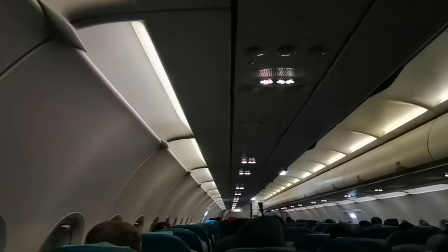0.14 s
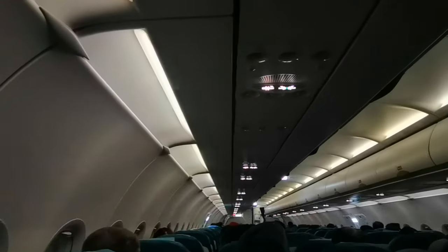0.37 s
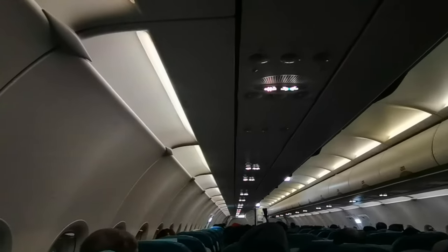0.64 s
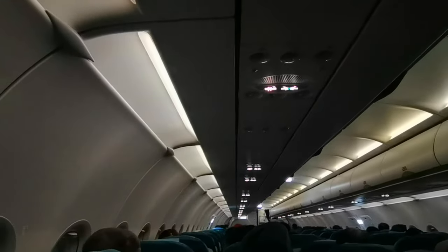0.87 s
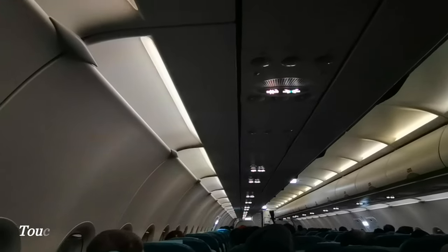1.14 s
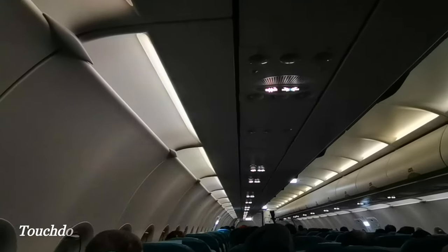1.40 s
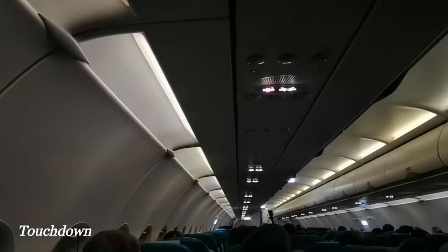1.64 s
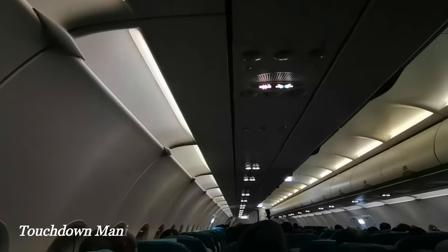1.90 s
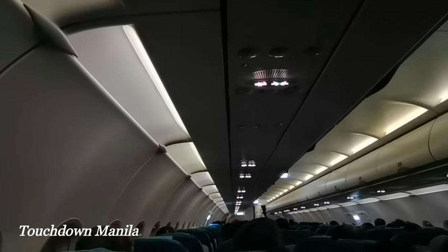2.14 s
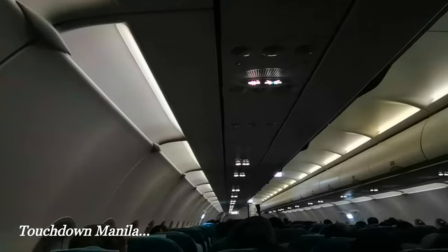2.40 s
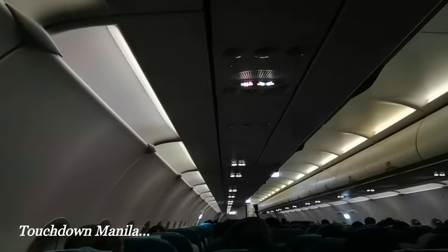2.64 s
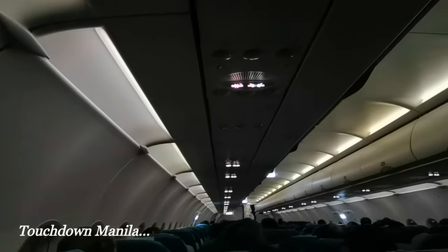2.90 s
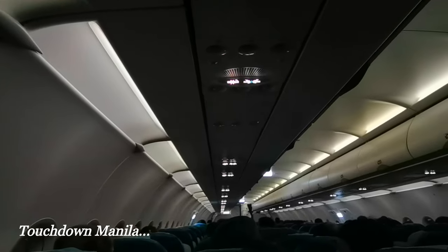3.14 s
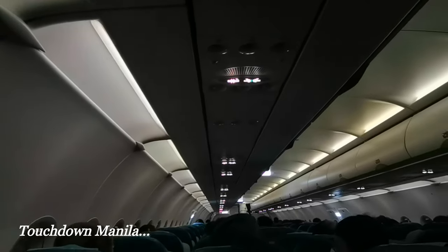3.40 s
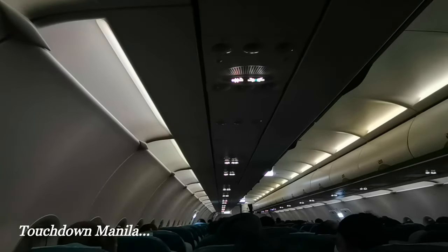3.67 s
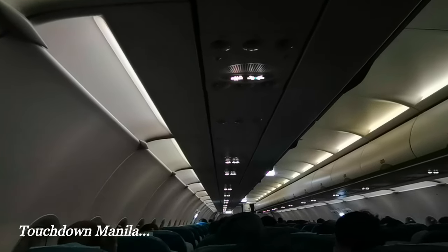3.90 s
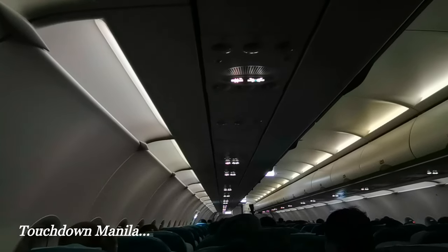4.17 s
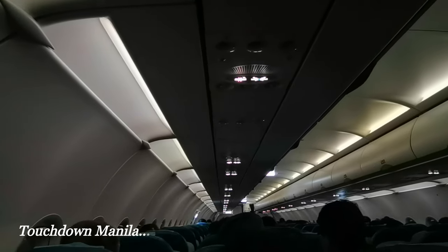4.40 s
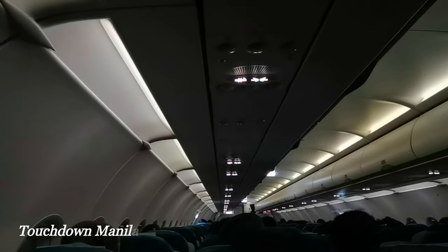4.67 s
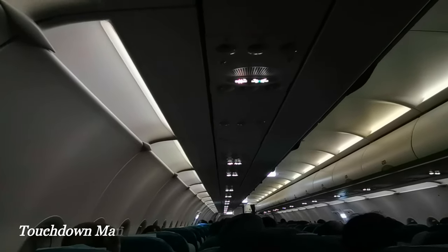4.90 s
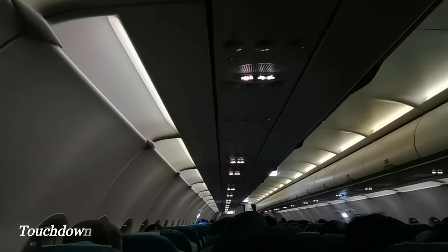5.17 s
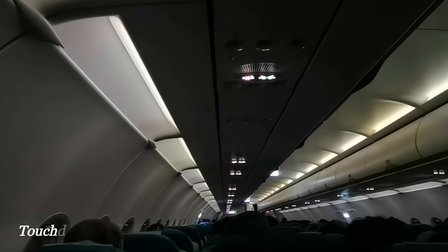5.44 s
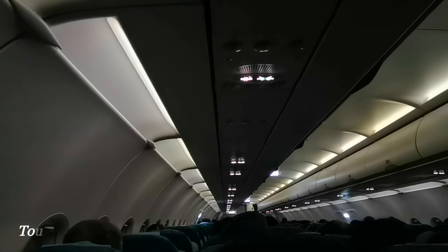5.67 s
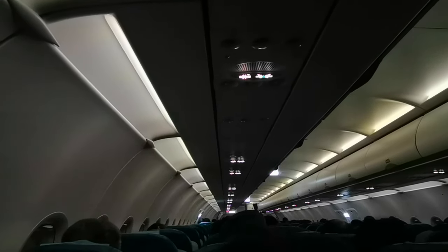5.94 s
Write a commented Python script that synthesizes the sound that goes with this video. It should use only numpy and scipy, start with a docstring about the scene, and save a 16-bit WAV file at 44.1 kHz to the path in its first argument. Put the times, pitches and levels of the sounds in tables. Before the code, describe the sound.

A close snap and hull boom open a loud, bass-heavy cabin rumble with jet roar, which falls off after four seconds into quieter rolling.

```python
"""Hull boom and a close snap open the scene: an airliner cabin rolling out after touchdown.
Swelling low noise booms in the hull; wavering noise carries wheel rumble through the floor.
Engine growl, roar and hiss are shaped noise under reverse thrust that eases, then is cut.
Filtered puffs make trim ticks and rustles; resonated noise makes a thin whine and a late drone.
Two microphone ports with different treble pick it up, over a faint treble noise floor."""
import sys
import numpy as np
from scipy import signal
from scipy.fft import rfft, irfft, next_fast_len
from scipy.io import wavfile
from scipy.ndimage import uniform_filter1d, minimum_filter1d

SR = 44100
rng = np.random.default_rng(int(sys.argv[2]) if len(sys.argv) > 2 else 0)


def gain_from_db(level_db):
    """Convert decibel levels to linear amplitude factors (20 dB per decade)."""
    decades = np.asarray(level_db, float) / 20
    return 10 ** decades


def wrap_up_sound(samples):
    """Save the sound to the file named by the first command line argument, as 16-bit audio."""
    columns = np.atleast_2d(samples).T
    # keep every value between -1 and 1, then stretch to whole-number steps
    tamed = np.clip(columns, -1, 1)
    steps = np.round(tamed * 32767).astype(np.int16)
    wavfile.write(sys.argv[1], SR, steps)


N = 266883

# Left-right likeness of the noise layers [freq_hz, coherence_0_to_1]
COHERENCE = [(30, .999), (58, .997), (80, .972), (200, .93), (290, .91), (390, .8), (520, .48), (700, .6),
             (900, .24), (1100, .05), (1500, .25), (2300, .03), (15000, .03)]
# Phase by which the right port lags [freq_hz, lag_rad]
PORT_LAG = [(35, .11), (110, .23), (155, .3), (290, .28), (520, .58), (900, 1.), (1500, 3.4), (2000, 4.1)]
# Difference of the ports' colour [freq_hz, left_minus_right_db]
PORT_COLOUR = [(40, 1.6), (200, 1.75), (700, .5), (1300, -1.5), (3200, 1), (4200, -4), (5200, -4.5),
               (6200, 2), (7200, 17.5), (8200, 4.5), (9700, 3.5), (11700, 10), (12700, 4), (13700, 2.5),
               (15500, 3.5)]
# Reverse thrust held, eased, then cut [time_s, level_re_full_db]
THRUST = [(0, 0), (2.8, 0), (3.5, -1), (4.23, -4.5), (4.41, -4), (4.5, -12), (4.75, -15), (5.2, -19),
          (6.05, -20.5)]
# Shaking from the wheels as the roll slows [time_s, level_re_full_speed_db]
ROLL = [(0, 0.5), (2.8, 0), (3.6, -1), (4.3, -4.5), (4.75, -4.5), (5.1, -8.5), (5.4, -11), (5.7, -12),
        (6.05, -14.5)]
# Strength of the thin whine before flicker and panning [time_s, relative_level_db]
WHINE_LEVEL = [(0, -88.5), (3, -86), (3.6, -76), (4.3, -69), (4.6, -72.5), (5.05, -77), (5.3, -90),
               (5.6, -79), (6.05, -81)]
# Strength of the breathy drone as the roar dies, before panning [time_s, relative_level_db]
DRONE_LEVEL = [(5.3, -99), (5.5, -78.5), (5.7, -64), (5.85, -65.5), (6.05, -70)]
# Resonances of the drone [freq_hz, width_hz, level_db]
DRONE_PEAKS = [(1490, 95, -5.5), (1700, 150, -1), (2950, 220, -12)]
# Ticks of trim and latches [start_s, level_db, low_hz, high_hz, left_minus_right_db]
TICKS = [(0.0488, -37, 3500, 5600, 8), (2.57, -49, 2400, 5000, 2), (3.0, -52.5, 2200, 6100, -1),
         (3.838, -64, 12000, 15260, 4.5), (4.136, -61.5, 7000, 7560, -5), (4.611, -48, 2200, 15550, 3),
         (4.934, -51.5, 1290, 5700, -5), (5.482, -60.5, 1290, 5500, -5), (5.647, -55, 1800, 5900, -2)]
# Soft rustles of the same trim [start_s, level_db, low_hz, high_hz, t60_s]
RUSTLES = [(.222, -59.5, 6500, 15500, .15), (0.969, -67, 8500, 15400, 0.23), (1.815, -63, 6500, 15480, .12),
           (1.95, -65, 11000, 15200, .1), (2.34, -55.5, 4930, 15750, 0.12), (2.655, -61, 6360, 15300, .12),
           (2.859, -67.5, 9000, 15700, .2), (3.93, -62.5, 6360, 15200, .1), (4.27, -56.5, 3650, 4460, 0.58),
           (4.54, -68.5, 7050, 7400, 0.46), (5.36, -69, 5000, 15100, .14)]
# Resonances of the trim [freq_hz, width_hz, relative_level_db]
TRIM_PEAKS = [(1550, 230, 5.5), (2320, 600, -3), (4200, 740, -0.5), (7000, 1100, 5.5), (14500, 2500, -1.5)]
# Close snap [start_s, ring_peak_db, left_minus_right_db]
SNAPS = [(.06035, -4, 12)]
# Modes of the snap [freq_hz, relative_level_db, t60_s]
SNAP_MODES = [(696, -4, 0.0061), (1590, 11, 0.0013), (3730, 9.5, 0.0019), (5200, -7, 0.0016),
              (6840, -10.5, 0.0056), (13300, -11.5, .004)]
# Wheel rumble spectrum [freq_hz, relative_level_db_per_hz]
RUMBLE_SHAPE = [(41, -26.5), (70, -10.5), (81, -1.5), (118, 1), (172, -3), (240, -13.5), (310, -40),
                (530, -120)]
# Brief surges and dips of the rumble [time_s, change_db]
WAVERS = [(.285, -8), (.57, -6.5), (1.261, 6.5), (1.3, -12), (1.335, 6.5), (1.38, -10.5), (1.48, -5),
          (2.16, -11.5), (2.33, -7.5), (2.42, 3), (2.74, 5), (2.786, -5), (3.549, -9), (3.691, 0.5),
          (3.79, -4), (3.84, 3), (3.89, -4.5), (4.38, -3), (4.57, -3), (5.208, -8), (5.43, -8), (5.56, 4),
          (5.63, 5), (5.711, -7.5), (5.8, 3.5), (5.85, -5.5), (5.91, 7)]
# Rumble balance and dulling as the roll slows [time_s, left_minus_right_db, upper_part_loss_db]
LEAN = [(4.6, -1.5, -0.5), (4.9, 3, 0.5), (5.25, 6, 3.5), (5.5, 6, -3.5), (5.65, 4, 5.5), (5.9, 4, 7.5)]
# Jet growl spectrum [freq_hz, relative_level_db_per_hz]
GROWL_SHAPE = [(120, -34), (210, -1), (232, -8.5), (279, 0.5), (430, -17), (560, -51), (950, -120)]
# Jet roar spectrum [freq_hz, relative_level_db_per_hz]
ROAR_SHAPE = [(240, -22), (410, -6), (461, -3), (638, -4), (1190, -21), (1400, -23.5), (1820, -36.5),
              (3080, -120)]
# Hiss spectrum [freq_hz, relative_level_db_per_hz]
HISS_SHAPE = [(650, -26), (1100, -6.5), (1190, -6), (1890, -6), (3250, -15.5), (4170, -13.5), (4790, -18.5),
              (5990, -21), (7370, -24.5), (7960, -24), (8600, -35.5), (11200, -59), (18900, -120)]
# Spectrum of the faint top-band noise floor [freq_hz, relative_level_db_per_hz]
TREBLE_FLOOR_SHAPE = [(7500, -36), (8600, -4.5), (9500, -7), (11500, -6), (14500, -0.5), (15600, -7.5)]
# Growl, roar, hiss, treble floor, one row each [level_at_full_db, thrust_fall_share, roll_fall_share]
NOISE_LAYERS = [(-24, .2, 1.22), (-33.5, 0.94, .01), (-50, 0.74, .01), (-70.5, 0.39, .2)]
# Hull boom spectrum [freq_hz, relative_level_db_per_hz]
BOOM_SHAPE = [(15, -40), (27, -21), (40, -8), (46, -3), (51, 0), (58, -3), (68, -8), (78, -10), (95, -30),
              (190, -120)]
# Loudest boom swells, where the runway shakes the hull [centre_s, level_db, half_width_s]
BOOM_SWELLS = [(.09, -8.5, .05), (.24, -19.5, 0.13), (.55, -11.5, 0.11), (.74, -18.5, 0.1),
               (.85, -9.5, 0.064), (1.031, -15.5, 0.089), (1.171, -12.5, 0.025), (1.28, -16, 0.037),
               (1.4, -9.5, 0.04), (1.51, -9, .025), (1.608, -7, 0.014), (1.7, -14.5, .035),
               (1.802, -12, 0.036), (1.94, -6.5, 0.017), (2.119, -10.5, 0.09), (2.22, -10, .025),
               (2.339, -7.5, 0.025), (2.48, -9.5, 0.038), (2.65, -13, 0.13), (2.9, -7.5, 0.066),
               (3.08, -10, 0.05), (3.309, -12, 0.07), (3.512, -16, 0.065), (3.8, -15.5, 0.15),
               (4.08, -10, 0.041), (4.23, -20, 0.07), (4.539, -17.5, 0.049), (4.72, -16, 0.13),
               (5.07, -17.5, 0.12), (5.35, -18.5, 0.03), (5.542, -13, 0.02), (5.66, -14.5, 0.14),
               (5.901, -19, 0.12)]


def evened(x):
    """Scales to unit rms."""
    return x / np.sqrt(np.mean(x ** 2) + 1e-20)


def read(points, hz):
    """Reads a spectrum table on a log frequency axis."""
    table_hz, value = np.transpose(points)
    return np.interp(np.log(hz + 1), np.log(table_hz + 1), value)


def curve(rows, column=1):
    """Interpolates a time table to every sample."""
    rows = np.asarray(rows)
    return np.interp(np.arange(N) / SR, rows[:, 0], rows[:, column])


def add(mix, start_s, sound):
    """Adds a sound in place, cut at the end of the mix."""
    part = mix[:, round(start_s * SR):][:, :sound.shape[1]]
    part += sound[:, :part.shape[1]]


def smoothed(x, size, axis=-1):
    """Applies a moving average twice."""
    once = uniform_filter1d(x, size=size, axis=axis)
    return uniform_filter1d(once, size=size, axis=axis)


def resonate(x, hz, width_hz):
    """Shifts hz down to zero, smooths, and shifts back: a resonance of gain 1."""
    turn = np.exp(2j * np.pi * hz * np.arange(x.shape[-1]) / SR)
    pole = np.exp(-np.pi * width_hz / SR)
    return 2 * (turn * signal.lfilter([1 - pole], [1, -pole], x / turn)).real


def turbulence(shape, size, patchy_db, gust_db):
    """Two-port noise from random short-time spectra, with patches and wide-band gusts."""
    frames = 4 * N // size + 6
    hz = np.fft.rfftfreq(size, 1 / SR)
    a, b, c, d, patches = rng.standard_normal((frames, len(hz), 5)).T
    patches = uniform_filter1d(uniform_filter1d(patches, size=9, axis=0), size=9, axis=1)
    patches = evened(patches)
    gusts = evened(uniform_filter1d(rng.standard_normal(frames), size=9))

    same = np.clip(read(COHERENCE, hz), -1, 1)[:, None]
    left = a + 1j * b
    right = same * left + np.sqrt(1 - same ** 2) * (c + 1j * d)
    right = right * np.exp(-1j * read(PORT_LAG, hz))[:, None]
    level_db = read(shape, hz)[:, None] + patchy_db * patches + gust_db * gusts
    spectra = np.array([left, right]) * gain_from_db(level_db)
    pair = signal.istft(spectra, nperseg=size, noverlap=size - size // 4)[1]
    pair = pair[:, size // 2:][:, :N]
    return pair / np.sqrt(np.mean(pair.mean(0) ** 2))  # unit rms of the port mean


def levelled(x, share):
    """Takes out a share of the noise's own lumps, so typed swells stand out."""
    own = np.sqrt(smoothed(x.mean(0) ** 2, 2000) + 0.036)
    return evened(x / own ** share)


def whine():
    """Narrowly resonated noise: a thin fuzzy tone whose level flickers, stronger on the left."""
    flicker_db = 3.5 * evened(smoothed(rng.standard_normal(N), 3000))
    side_db = np.array([[3], [-6]])
    tone = evened(resonate(rng.standard_normal(N), hz=6400, width_hz=16))
    return gain_from_db(curve(WHINE_LEVEL) + flicker_db - 5.5 + side_db) * tone


def drone():
    """Air noise passed twice through each of a few resonances, stronger on the right."""
    air = rng.standard_normal(N)
    sound = np.zeros(N)
    for hz, width_hz, level_db in DRONE_PEAKS:
        peak = resonate(resonate(air, hz, width_hz), hz, width_hz)
        sound += gain_from_db(level_db) * evened(peak)
    side_db = np.array([[-8], [4]])
    return gain_from_db(curve(DRONE_LEVEL) + side_db) * sound


def tick(level_db, low_hz, high_hz, pan_db, rise_s, t60_s):
    """A short puff of band noise and a longer trim ring; two early echoes make its colour uneven."""
    t = np.arange(12000) / SR
    late_s = np.maximum(t - rise_s, 0)
    band = signal.butter(N=3, Wn=[low_hz, high_hz], btype="band", fs=SR, output="sos")
    air = rng.standard_normal((2, len(t)))
    echoes = sum(0.44 * np.roll(air, lag, axis=1) for lag in rng.integers(15, 70, size=2))
    air = signal.sosfilt(band, air + echoes)

    ring = evened(sum(gain_from_db(peak_db) * resonate(air, hz, width_hz) / np.sqrt(width_hz)
                      for hz, width_hz, peak_db in TRIM_PEAKS))
    dulled = signal.lfilter(*signal.butter(N=1, Wn=2500, fs=SR), air)
    puff = evened(dulled + 0.15 * air)
    puff_t60_s = 0.58 * t60_s
    sound = puff * gain_from_db(-60 * late_s / puff_t60_s) + ring * gain_from_db(-5 - 60 * late_s / t60_s)
    side_db = np.array([[pan_db], [-pan_db]]) / 2
    return gain_from_db(level_db + side_db) * np.minimum(t / rise_s, 1) * sound


def trim():
    """Ringing trim: sharp ticks from either side and soft rustles from all around."""
    out = np.zeros((2, N))
    for start_s, *row in TICKS:
        add(out, start_s, tick(*row, rise_s=0.0014, t60_s=0.18))
    for start_s, level_db, low_hz, high_hz, t60_s in RUSTLES:
        rustle = tick(level_db, low_hz, high_hz, pan_db=0, rise_s=0.12 * t60_s, t60_s=t60_s)
        add(out, start_s, rustle)
    return out


def snap():
    """A close click rings six very short modes and leaves a faint bright tail."""
    out = np.zeros((2, N))
    t = np.arange(6000) / SR
    ring = -sum(gain_from_db(level_db - 60 * t / t60_s) * np.sin(2 * np.pi * hz * t)
                for hz, level_db, t60_s in SNAP_MODES)
    ring = ring / abs(ring).max()
    air = resonate(rng.standard_normal((2, len(t))), hz=4800, width_hz=7000)
    tail = gain_from_db(-36.5 - 60 * t / 0.2) * evened(air)
    for start_s, peak_db, pan_db in SNAPS:
        side_db = np.array([[pan_db], [-pan_db]]) / 2
        add(out, start_s, gain_from_db(peak_db) * (gain_from_db(side_db) * ring + tail))
    return out


def wheels():
    """Floor-borne rumble: low noise that wavers, fades and dulls as the roll slows."""
    x = levelled(turbulence(RUMBLE_SHAPE, size=4096, patchy_db=-0.4, gust_db=-1.6), share=0.26)
    low = signal.sosfiltfilt(signal.butter(N=2, Wn=140, fs=SR, output="sos"), x)
    x = evened(low + (x - low) * gain_from_db(-curve(LEAN, column=2)))
    t = np.arange(N) / SR
    waver_width_s = 0.023
    waver_db = sum(change_db * np.exp(-((t - time_s) / waver_width_s) ** 2)
                   for time_s, change_db in WAVERS)
    side_db = np.array([[0.5], [-0.5]]) * curve(LEAN)
    return gain_from_db(-12.5 + curve(ROLL) + waver_db + side_db) * x


def engines_and_treble_floor():
    """Jet growl and roar with a hiss above them; a faint, steadier treble noise floor on top."""
    growl = turbulence(GROWL_SHAPE, size=2048, patchy_db=1.03, gust_db=0.15)
    roar = turbulence(ROAR_SHAPE, size=2048, patchy_db=1.1, gust_db=0.76)
    hiss = turbulence(HISS_SHAPE, size=512, patchy_db=0.88, gust_db=0.24)
    treble_floor = turbulence(TREBLE_FLOOR_SHAPE, size=512, patchy_db=1.8, gust_db=0.5)
    thrust_db, roll_db = curve(THRUST), curve(ROLL)
    out = np.zeros((2, N))
    for (level_db, by_thrust, by_roll), layer in zip(NOISE_LAYERS, [growl, roar, hiss, treble_floor]):
        out += gain_from_db(level_db + by_thrust * thrust_db + by_roll * roll_db) * layer
    return out


def boom():
    """Noise in the hull's lowest mode: a low bed that follows the roll, with bell-shaped swells."""
    t = np.arange(N) / SR
    power = gain_from_db(-21 + curve(ROLL)) ** 2
    for centre_s, level_db, half_width_s in BOOM_SWELLS:
        power += gain_from_db(level_db) ** 2 * np.exp(-2 * ((t - centre_s) / half_width_s) ** 2)
    noise = turbulence(BOOM_SHAPE, size=8192, patchy_db=-1.7, gust_db=-1.0)
    return np.sqrt(power) * levelled(noise, share=0.68)


def scene():
    """Sums all sources at the two ports."""
    return whine() + drone() + trim() + snap() + wheels() + engines_and_treble_floor() + boom()


def roll_off(x):
    """The treble ends steeply here."""
    return signal.sosfilt(signal.butter(12, 16480, fs=SR, output="sos"), x)


def record(dry):
    """Port colour and band edge, a short end fade, and a limiter on the loudest swings."""
    size = next_fast_len(N + 4096)
    hz = np.fft.rfftfreq(size, 1 / SR)
    edge_hz, end_fade_s = 15760, 0.012
    side_db = np.array([[0.5], [-0.5]]) * read(PORT_COLOUR, hz)
    colour = gain_from_db(side_db) * (hz < edge_hz)
    remaining_s = np.arange(N)[::-1] / SR
    ending = np.sin(np.pi / 2 * np.minimum(remaining_s / end_fade_s, 1)) ** 2
    x = irfft(rfft(dry * ending, size) * colour, size)[:, :N]

    room_db = np.minimum(-1.1 - 20 * np.log10(abs(x).max(0) + 1e-9), 0)
    gain_db = uniform_filter1d(minimum_filter1d(room_db, size=1500), size=1500)
    return roll_off(x * gain_from_db(gain_db))


dry = scene()
out = record(dry)
wrap_up_sound(out)
```